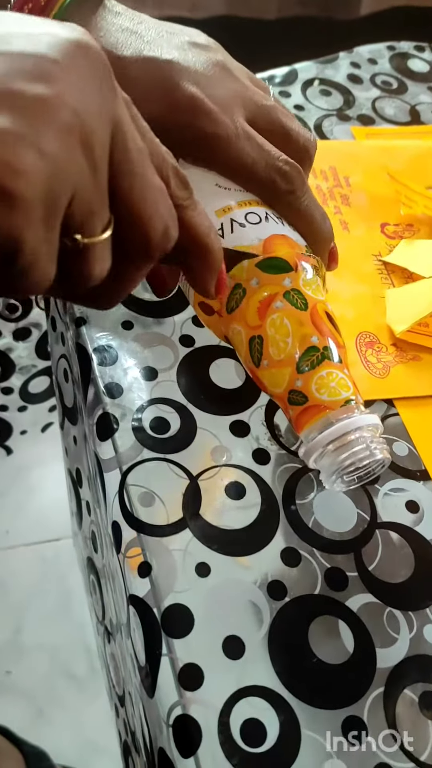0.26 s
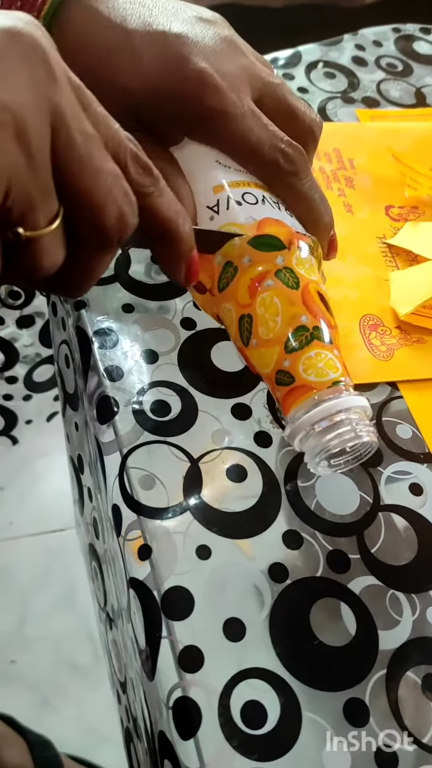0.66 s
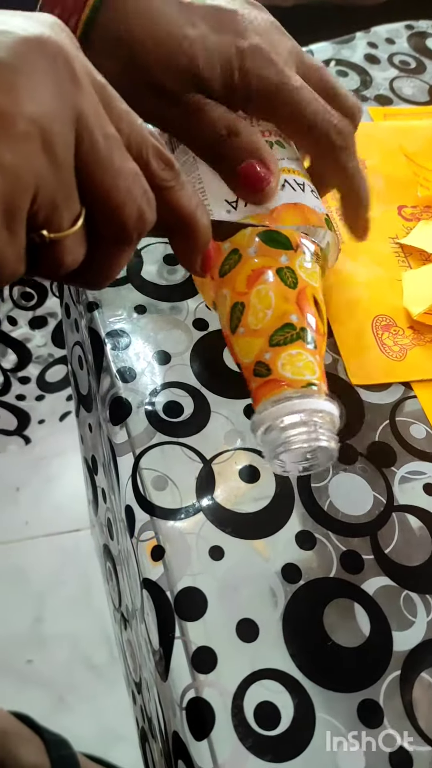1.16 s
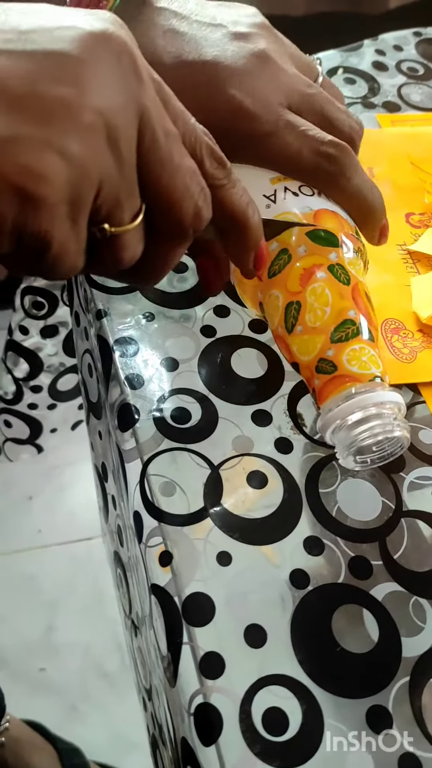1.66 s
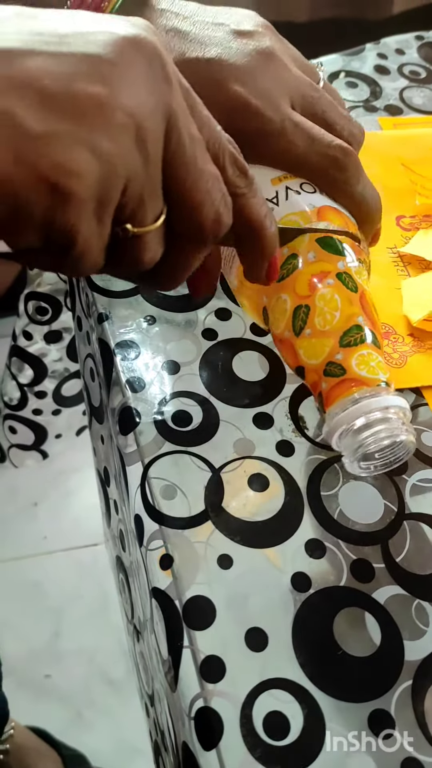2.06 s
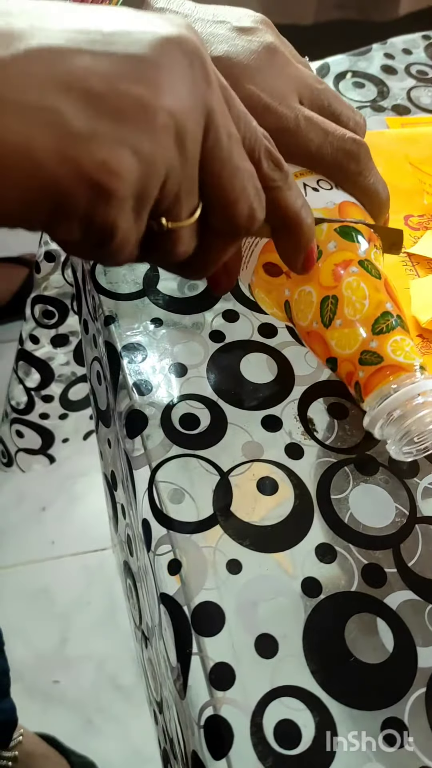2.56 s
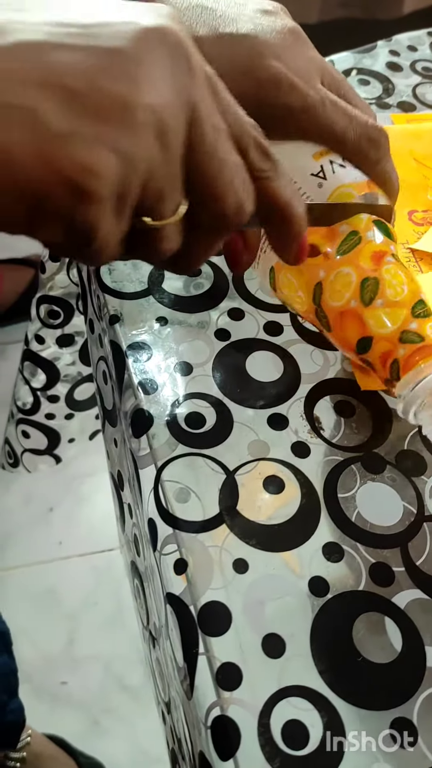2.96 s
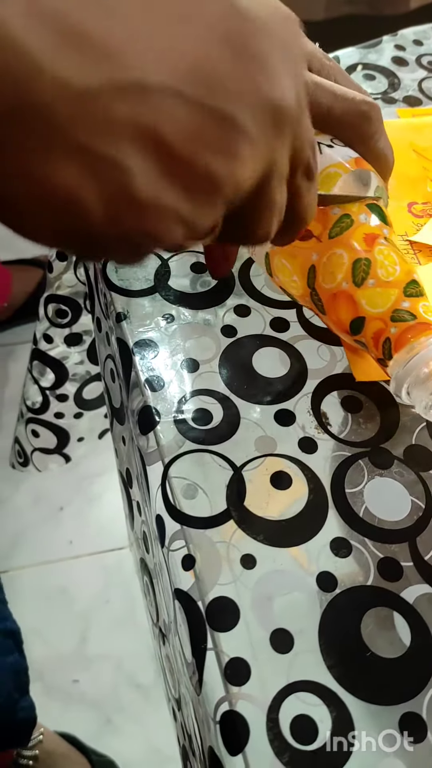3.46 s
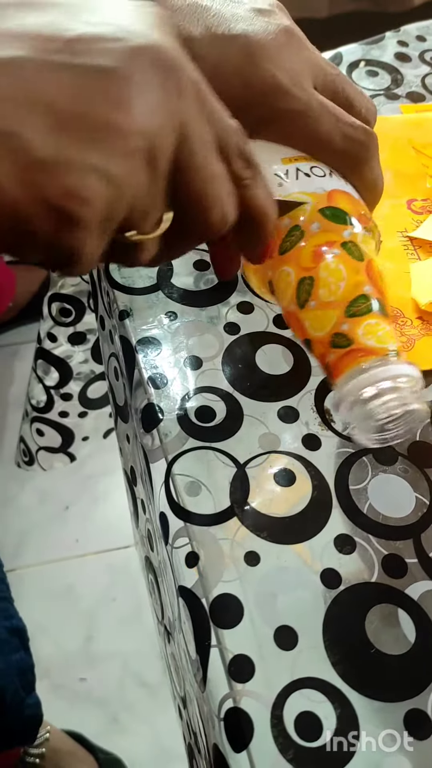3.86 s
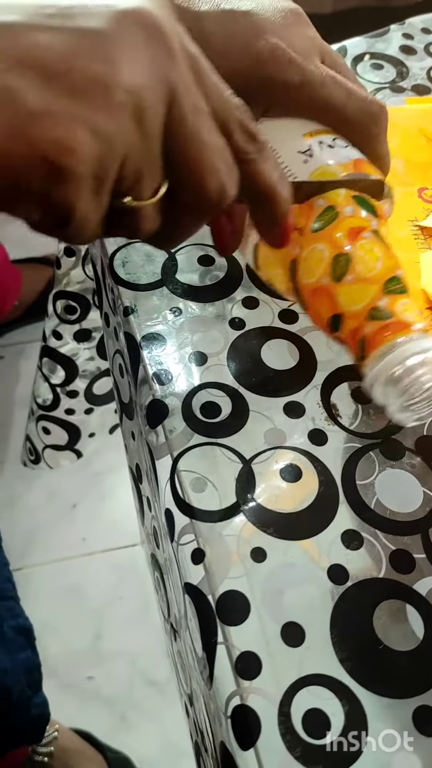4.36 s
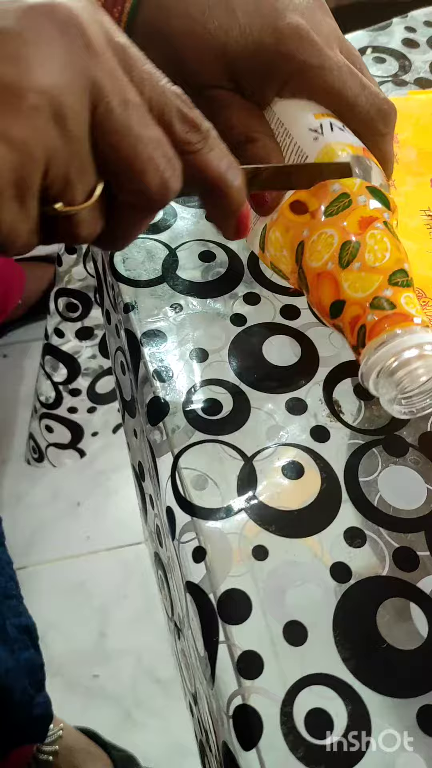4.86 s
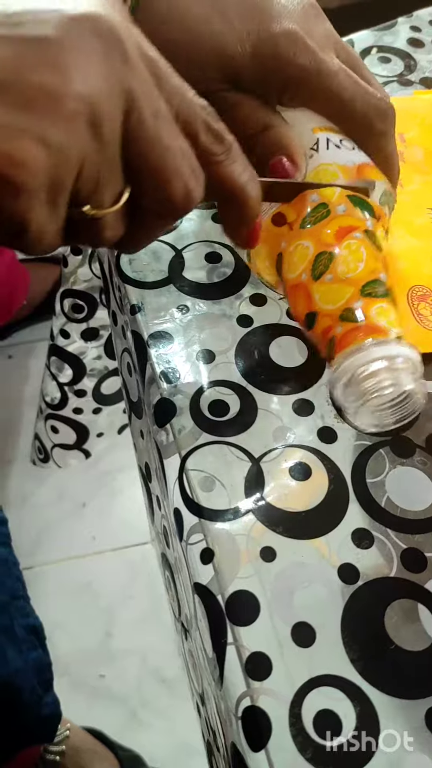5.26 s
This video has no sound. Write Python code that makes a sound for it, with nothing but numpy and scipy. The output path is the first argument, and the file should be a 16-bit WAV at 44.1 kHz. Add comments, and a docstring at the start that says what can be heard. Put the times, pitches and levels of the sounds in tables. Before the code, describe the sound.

Close stereo phone pickup of an empty bottle being handled: a soft cluster of crackles early, isolated snaps, a strong flurry before three seconds, a lull, then a dense rattle of pops around four seconds and more to the end. Fingers and blade scuff the plastic, hard pushes add low dull knocks, and hard walls add a short bright tail.

```python
"""In a small hard-walled room, a thin empty plastic bottle is held on a table and pressed with a knife.
Its wall buckles in snaps: a bright tick and a crack of filtered noise, then the hollow pop of the panel,
a sine that swells and fades. Fingers and blade rub in between as noise swelling with each stroke, and
hard pushes add low sagging notes. Resonators ring as wall and enclosed air, decaying noise as the room;
a phone listens from close by through two ports."""
import sys
import numpy as np
from scipy import signal
from scipy.fft import rfft, irfft, next_fast_len
from scipy.io import wavfile

SR = 44100
rng = np.random.default_rng(int(sys.argv[2]) if len(sys.argv) > 2 else 0)


def materialize(psi):
    """Save the field psi as 16-bit PCM at rate SR to the path in sys.argv[1].

    A 1-D psi becomes a single channel; in a 2-D psi each row is a channel.
    """
    bounded = np.clip(np.atleast_2d(psi).T, -1, 1)
    quanta = np.round(bounded * 32767).astype(np.int16)
    wavfile.write(sys.argv[1], SR, quanta)


N = 242682  # samples
PORT_LAG_S = 0.00023  # direct sound reaches the left port this much after the right
BODY_PAN_DB = 2.8  # the panel faces the left port: left minus right


def undb(db):
    """Level law: amplitude gain is 10 to the power of dB / 20."""
    return 10 ** (np.asarray(db) / 20)


def unit(x):
    """Normalisation by mean power: scale to rms 1."""
    return x / np.sqrt(np.mean(x ** 2) + 1e-20)


def bins(x):
    """Discrete Fourier transform: the frequencies [Hz] of the spectrum of x."""
    return np.arange(x.shape[-1] // 2 + 1) * SR / x.shape[-1]


def at(hz, points):
    """Interpolation of (frequency [Hz], value) points on a logarithmic frequency axis."""
    f, v = np.transpose(points)
    return np.interp(np.log(np.maximum(hz, 1)), np.log(f), v)


def colour(x, points):
    """Minimum-phase filtering: folding the cepstrum makes a causal filter of the given (Hz, dB) shape."""
    n = 2 * next_fast_len(x.shape[-1] // 2 + 1, True)
    hz = np.arange(n // 2 + 1) * SR / n
    cepstrum = irfft(np.log(undb(at(hz, points))), n)
    cepstrum[1:n // 2] *= 2
    cepstrum[n // 2 + 1:] = 0
    response = np.exp(rfft(cepstrum))
    return irfft(rfft(x, n) * response, n)[..., :x.shape[-1]]


def resonate(x, hz, width):
    """Simple resonance: a band-pass with gain 1 at its centre, width in Hz."""
    return signal.lfilter(*signal.iirpeak(hz, hz / width, fs=SR), x)


def swell(t, peak_s, sharp):
    """Attack and decay of an impulsive source: rises to 1 at peak_s and dies away."""
    u = np.maximum(t, 0) / peak_s
    return (u * np.exp(1 - u)) ** sharp


def burst(x, db):
    """Energy equivalence: give a short sound the energy of 5 ms at this rms level."""
    return x * undb(db) * np.sqrt(.005 * SR / np.sum(x ** 2))


def pan(x, db):
    """Interaural level difference: make the left channel this much louder than the right."""
    return x * undb(np.array([[db], [-db]]) / 2)


def add(out, x, s):
    """Superposition: mix x into out from time s."""
    i = max(round(s * SR), 0)
    out[:, i:i + x.shape[1]] += x[:, :max(N - i, 0)]


def port_time(size):
    """Propagation delay: time [s] since the event at the left and right ports."""
    return np.arange(size) / SR - np.array([[PORT_LAG_S], [0]])


def diffuse(size, alike_hz=750):
    """Diffuse-field coherence: noise from all around whose bass is alike at both ports."""
    mid, side = rng.standard_normal((2, size))
    f = bins(mid)
    apart = f ** 2 / (f ** 2 + alike_hz ** 2)
    shared = rfft(mid) * np.sqrt(1 - apart / 2)
    opposed = rfft(side) * np.sqrt(apart / 2)
    return irfft(shared + np.array([[1], [-1]]) * opposed, size)


# colour of the air noise in the room: (frequency [Hz], relative level [dB])
AIR_COLOUR = [(20, -9), (55, 5), (100, -10.5), (180, 7.5), (300, 3.5), (520, 1), (1000, -11), (2500, -13.5),
              (5000, -40), (8000, -33), (10500, -65), (15500, -50)]


def room_air():
    """Steady background noise: a diffuse field shaped mainly towards the bass."""
    noise = diffuse(size=next_fast_len(N, True))[:, :N]
    return undb(-56.5) * unit(colour(noise, AIR_COLOUR))


# share of a stroke spent speeding up; relative level of the resting grip [dB]
STROKE_RISE, GRIP_DB = 0.4, -62.5
# fingers and blade sliding on the plastic: (time at the fastest [s], relative level [dB], length scale [s])
STROKES = [(0.015, -44, .13), (0.413, -33, .08), (0.651, -35.5, .08), (1.038, -38.5, .13),
           (1.231, -45.5, .1), (1.742, -50.5, .4), (2.299, -35.5, .14), (2.486, -39.5, .07),
           (2.651, -41, .12), (2.789, -35, .2), (3.08, -47, .14), (3.447, -46.5, .09), (3.755, -34.5, .12),
           (4.12, -35.5, .08), (4.259, -36, 0.11), (4.493, -47, 0.11), (4.77, -24, .09), (5.11, -34, .1)]


def sliding():
    """Friction envelope: each stroke swells and dies away over the resting grip."""
    out = undb(GRIP_DB)
    for s, db, length in STROKES:
        u = (np.arange(N) / SR - s) / length
        side = np.where(u < 0, STROKE_RISE, 1 - STROKE_RISE)
        out = out + undb(db) * np.exp(-np.abs(u / side) ** 1.1)
    return out


# colour of the rubbing: (frequency [Hz], relative level [dB])
SLIDE_COLOUR = [(200, -3), (420, -1), (525, 7.5), (650, 9), (900, -2.5), (1500, -1.5), (3000, -5.5),
                (5500, -3), (7500, -4), (9000, -6), (10300, -18.5), (15500, -22.5)]


def rubbing(slips_per_s=420, spread_db=3.0, slip_s=0.0011, smooth=1.0):
    """Stick-slip friction: tiny slips of uneven size, each a short spit of noise, over a smooth hiss."""
    sizes = undb(spread_db * np.minimum(rng.exponential(size=N), 4))
    slips = (rng.random(N) < slips_per_s / SR) * sizes
    grip = signal.lfilter([1], [1, -np.exp(-1 / (slip_s * SR))], slips) + smooth
    noise = colour(grip * rng.standard_normal((2, N)), SLIDE_COLOUR)
    return unit(noise) * sliding() * undb(-8.5)


def ring(x, modes, stretch=1):
    """Modal superposition: modes driven by x, all detuned by one factor."""
    out = 0
    for hz, t60, db in modes:
        width = np.log(1000) / (np.pi * t60)
        out = out + undb(db) * resonate(x, hz * stretch, width)
    return out


# ringing of the air inside: (frequency [Hz], t60 [s], relative level [dB])
HOLLOW_MODES = [(508, 0.25, 1.5), (546.8, 0.28, -2.5), (656, 0.16, -14)]
# ringing of the plastic wall before detuning: (frequency [Hz], t60 [s], relative level [dB])
WALL_MODES = [(769, 0.024, -0.5), (1122, 0.023, -5), (1445, 0.084, 1), (1477, 0.13, -4),
              (1710, 0.068, -11.5), (2199, 0.059, 4), (4016, 0.038, -3)]


def bottle(x, detune=0.013):
    """Forced modal vibration: contact rings the air and the wall, detuned by one random factor per grip."""
    return x + ring(x, HOLLOW_MODES) + ring(x, WALL_MODES, 1 + detune * rng.standard_normal())


# reverberation time of the room: (frequency [Hz], t60 [s])
ROOM_T60 = [(150, 0.74), (500, 0.5), (1500, 0.49), (4000, 0.53), (8000, 0.47), (14000, 0.38)]
# colour of the reverberation: (frequency [Hz], relative level [dB])
ROOM_COLOUR = [(80, 0.5), (170, 2.5), (300, -5), (430, -0.5), (540, -8.5), (800, -1.5), (1100, 1),
               (1400, -1), (2500, -2), (4500, -3.5), (7500, -1.5), (9000, -5), (10500, -11.5), (15500, 1.5)]


def room(x, wet_db=-4.64, build_s=0.00096, early=0.66, early_s=0.028, size=2 ** 15):
    """Exponential reverberant decay: dense reflections off tiles and walls, each octave at its own rate."""
    t = np.arange(size) / SR
    noise = diffuse(size=size)
    octave = np.log2(np.clip(bins(noise), 125, 16000) / 125)
    spectrum, tail = rfft(noise), 0
    for k in range(8):
        band = irfft(spectrum * np.maximum(1 - abs(octave - k), 0), size)
        tail = tail + band * np.exp(-np.log(1000) * t / at(125 * 2 ** k, ROOM_T60))
    build_up = 1 - np.exp(-(t / build_s) ** 2)
    tail = tail * build_up * (1 + early * swell(t, early_s, 1.5))
    tail = colour(unit(tail) / np.sqrt(SR), ROOM_COLOUR)
    # the right channel is delayed to line up with the left before they are summed
    source = (x[0] + np.roll(x[1], int(PORT_LAG_S * SR))) / np.sqrt(2)
    return undb(wet_db) * signal.fftconvolve(source[None], tail, axes=1)


def crinkles(count=36, hz=550, fade_s=0.0086, pop_db=-1, thump_db=-14, crack_db=-3, tick_db=-3,
             spread_db=3, wide_db=5):
    """Random point process: faint buckles, likelier in stronger friction, at levels relative to it."""
    out, friction = np.zeros((2, N)), sliding()
    chance = np.cumsum(np.sqrt(friction))
    for when, size, side in rng.random((count, 3)):
        i = np.searchsorted(chance, when * chance[-1])
        db = 20 * np.log10(friction[i]) + spread_db * (2 * size - 1)
        pan_db = wide_db * (2 * side - 1)
        sound = snap(hz, db + pop_db, fade_s, db + thump_db, db + crack_db, EVEN_TILT_DB,
                     db + tick_db, RUN_S, pan_db)
        add(out, sound, i / SR)
    return out


def creases(t, count=5, within_s=0.034, top_db=-19, range_db=12):
    """Relaxation after buckling: a few tiny creases give way, weaker on the whole the later they come."""
    when, size = rng.random((2, count))
    out = 0
    for w, v in zip(when, size):
        out = out + undb(top_db - range_db * (w + v) / 2) * swell(t - w * within_s, 0.00019, 0.4)
    return out


def facets(x, count=4, low_hz=1200, high_hz=8500, q=7, ring_db=2):
    """Local resonance: small facets around each crease ring at random pitches, so snaps differ."""
    pitches = low_hz * (high_hz / low_hz) ** rng.random(count)
    return x + undb(ring_db) * sum(resonate(x, hz, hz / q) for hz in pitches)


def flip(t, hz, fade_s, rise_s=0.0044, bend=1.0, bend_s=0.0017):
    """Snap-through of a panel: a hard flip bends down in pitch and is soon over, a soft one rings hollow."""
    hard = min(0.0025 / max(fade_s, .0005), 1)
    pitch = hz * (1 + hard * (bend * np.exp(-np.maximum(t, 0) / bend_s) - .12))
    phase = 2 * np.pi * (np.cumsum(pitch * (t > 0), axis=1) / SR + rng.random())
    late = np.maximum(t - rise_s, 0)
    fade = np.exp((.002 - np.hypot(late, .002)) / max(fade_s, .0005) / 0.83)  # rounded at its start
    return np.sin(phase) * swell(np.minimum(t, rise_s), rise_s, 8.2) * fade


def thump(t, hz=290):
    """Damped bending vibration: the whole bottle flexes against the table near this pitch."""
    return np.sin(2 * np.pi * hz * (1 + 0.17 * rng.standard_normal()) * t) * swell(t, 0.0021, 1.8)


SNAP_SIZE = 2048  # samples
JERK_DB = 2.5  # how unevenly a crease runs (standard deviation)
# colour of the crack before its tilt: (frequency [Hz], relative level [dB])
CRACK_COLOUR = [(150, -27), (500, -20.5), (900, -0.5), (1150, -8), (1450, -4), (1900, -6.5), (2300, -5.5),
                (2900, -8), (3900, -8.5), (5200, -10.5), (6500, -15), (9000, -48.5)]
# colour of the tick: (frequency [Hz], relative level [dB])
TICK_COLOUR = [(3000, -24), (5000, -8.5), (6500, -7), (8000, -2.5), (9200, -3.5), (10300, -15.5),
               (12000, -17.5), (15500, -28)]


def snap(hz, pop_db, fade_s, thump_db, crack_db, tilt_db, tick_db, run_s, pan_db):
    """Buckling instability: a crease runs in jerks and sends the treble first, then the panel flips."""
    t = port_time(SNAP_SIZE)
    noise = rng.standard_normal((2, 2, SNAP_SIZE))
    shared = np.interp(t, t[1], rng.standard_normal(SNAP_SIZE))  # reaches both ports, lagged
    jerks = undb(JERK_DB * np.interp(t, t[1, ::32], rng.standard_normal(SNAP_SIZE // 32)))
    run_s = max(run_s, .0004)
    after = creases(t)
    tick_shape = jerks * (swell(t, 0.27 * run_s, 0.33) + 0.17 * swell(t, 0.0038, 2.6)) + after
    crack_shape = jerks * (swell(t, run_s, 1.45) + 0.31 * swell(t, 0.0033, 1.55)) + after
    tick = colour((noise[0] + 0.51 * shared) * tick_shape, TICK_COLOUR)
    tilted = [(f, db + tilt_db * np.log2(np.clip(f, 1000, 5000))) for f, db in CRACK_COLOUR]
    crack = colour((noise[1] + 1.3 * shared) * crack_shape, tilted)
    body = burst(flip(t, hz, fade_s), pop_db - .6) + burst(thump(t), thump_db)
    treble = burst(facets(crack), crack_db - .3) + burst(facets(tick), tick_db - 4.5)
    return pan(body, BODY_PAN_DB) + pan(treble, pan_db)


# a pop of this relative level makes a thump of this one; the hand lets through this share of each dB more
USUAL_POP_DB, THUMP_DB, THUMP_SHARE = -21, -44.5, 0.49
# crack tilt when tick and crack are equal [dB per octave], and its change per dB of tick over crack
EVEN_TILT_DB, TILT_PER_DB = -0.95, 0.62
# running time of a crease in a taut wall with tick and crack equal; time added just after a buckle;
# time constant of the wall tautening again
RUN_S, SLACK_RUN_S, TAUTEN_S = 0.001, 0.0013, 0.023
# a bright crease is quick: the taut running time halves for this much tick over crack
QUICK_DB = 16
# buckles of the wall: (time [s], nominal panel pitch [Hz], relative pop level [dB], nominal pop fade [s],
# relative crack level [dB], relative tick level [dB], left minus right of crack and tick [dB])
SNAPS = [(0.1133, 553, -31.5, 0.0093, -32, -33.5, -3.5), (0.158, 539, -32.5, 0.047, -54, -61, 2),
         (0.3732, 518, -38, 0.031, -30, -23.5, -3.5), (0.426, 522, -30, 0.017, -33, -41, -1),
         (0.453, 549, -19, 0.011, -20, -16, -2), (0.5953, 582, -21, 0.0042, -29, -25.5, -7.5),
         (0.6255, 559, -25.5, 0.013, -37, -54, -3), (0.6635, 531, -22.5, 0.01, -32.5, -31, -9),
         (0.6726, 550.5, -16, 0.017, -24.5, -29.5, -1), (0.693, 592, -21.5, 0.01, -27, -38.5, -4),
         (0.6976, 546, -24, 0.0073, -30, -28.5, -5), (0.8, 550, -39.5, 0.0034, -34.5, -35.5, 3),
         (0.8835, 570, -37, 0.0029, -37, -36, 3), (0.9193, 630, -9.5, 0.0018, -10.5, -18, 3.5),
         (0.9708, 560, -44, .002, -42, -29, -4), (1.195, 549, -40, .012, -65, -70, 0),
         (1.2205, 555, -44, 0.0071, -55, -45, 1), (1.2871, 580, -20.5, 0.0032, -16.5, -19, -5),
         (1.844, 512, -40.5, 0.0055, -55, -51, 6), (1.889, 524, -44, 0.0052, -54, -52, 0),
         (2.057, 580, -53, .002, -34, -37, 3), (2.0697, 546, -37.5, 0.0013, -52, -32, 12),
         (2.083, 650, -31, .002, -25.5, -20, -3), (2.115, 630, -19, 0.00088, -12, -12.5, 6),
         (2.1588, 600, -16.5, .002, -15, -14, 9), (2.264, 544, -34, 0.0016, -31, -20.5, 1),
         (2.2718, 586, -9.5, 0.0016, -14, -28.5, -2), (2.2971, 512, -16.5, 0.013, -29.5, -22, 3),
         (2.3073, 522, -16.5, 0.0061, -35, -29, 9), (2.3164, 535, -17.5, 0.0083, -33, -34, -2),
         (2.5452, 594, -13, 0.0013, -12, -16, 4), (2.5768, 664, -46, .002, -25.5, -18.5, 5),
         (2.5905, 602, -32, .003, -24.5, -16.5, 4.5), (2.719, 585, -35, 0.0023, -29.5, -31, 5),
         (2.7366, 601, -9.5, 0.00084, -15, -23, 0), (2.757, 440, -18, .004, -26, -26, 3),
         (2.7752, 648, -14.5, 0.0037, -20, -28.5, 4), (2.8061, 495, -10.5, 0.0045, -12, -19, -1),
         (2.886, 534, -60, .0013, -58, -34.5, -20.5), (3.0104, 548, -11.5, 0.0014, -12.5, -18.5, -5.5),
         (3.296, 508, -42.5, 0.0047, -56.5, -82.5, 0), (3.482, 542, -44, .002, -43, -57, 6),
         (3.518, 610, -58, .004, -54, -43.5, 3), (3.6332, 597, -13, 0.0027, -14.5, -26, 0),
         (3.6385, 540, -25.5, 0.00074, -20.5, -14, 3.5), (3.6565, 873, -26.5, 0.00048, -35, -22.5, -4),
         (3.669, 710, -47, .002, -32, -21.5, 2), (3.7148, 577, -33, 0.0031, -24.5, -17.5, 1),
         (3.8682, 575, -22.5, 0.0037, -24.5, -22.5, -2.5), (3.927, 555, -22, .0035, -23.5, -25, 2),
         (3.9391, 588, -11.5, 0.0031, -15.5, -13.5, 2), (3.9492, 499, -23, 0.0041, -29, -24, 4),
         (3.9803, 573, -16.5, 0.0046, -20, -17, -3), (3.9862, 501, -20.5, 0.0045, -18.5, -18.5, 4),
         (4.0109, 532, -22.5, 0.0053, -21, -25, -6), (4.0169, 543, -19, 0.0049, -20, -29, 3),
         (4.0761, 626, -28, 0.0033, -24, -20.5, 0), (4.0976, 534, -18.5, 0.0041, -25, -34, -1),
         (4.1252, 598, -20, 0.0098, -21, -25.5, 0), (4.1551, 547, -13.5, 0.0041, -25, -27, 2),
         (4.1611, 624, -6, 0.0032, -18.5, -24, 1), (4.2693, 640, -48, 0.0017, -22, -17.5, 3),
         (4.28, 650, -45, 0.0022, -25.5, -22, 1.5), (4.328, 539, -15, 0.0034, -16, -16.5, 7.5),
         (4.3506, 540, -17.5, 0.0032, -15, -23, 3), (4.618, 608, -26, 0.0065, -30.5, -39, -4.5),
         (4.659, 645, -16.5, 0.0011, -15.5, -16.5, 2), (4.6622, 606, -15.5, 0.00054, -15, -22, -2),
         (4.6742, 568, -16.5, .0015, -18, -15.5, 0), (4.7282, 550, -12.5, 0.0026, -14.5, -15.5, -5.5),
         (4.7394, 575, -17, 0.0018, -18.5, -23.5, 13), (4.7449, 746, -14, 0.0011, -18.5, -22, 1),
         (4.7625, 592, -15, 0.0018, -23, -30, 10), (4.7665, 623, -17, 0.0017, -17, -32, -2),
         (4.7769, 527, -16.5, 0.0016, -19, -16.5, 2), (4.7878, 612, -22, 0.0025, -14, -23.5, 5.5),
         (4.7938, 632, -12.5, 0.0013, -23, -47, 0), (4.9171, 578, -23, .007, -27, -42.5, -4),
         (4.9908, 582, -14.5, 0.0011, -12, -11, 6.5), (5.0129, 663, -18.5, 0.0038, -26.5, -36, 16),
         (5.0315, 546, -23, 0.0035, -25, -20.5, 10), (5.1987, 638, -33.5, 0.0033, -45, -52.5, -2),
         (5.2522, 770, -50, .002, -54, -28, 15), (5.259, 703, -24.5, 0.0028, -17.5, -25.5, -2.5),
         (5.269, 698, -19, 0.0041, -18, -21, 0), (5.275, 650, -19, 0.0033, -23.5, -41, 19)]


def buckles():
    """Elastic buckling: the pop rocks the bottle, crack brightens with tick, a slack wall creases slowly."""
    out, last_s = np.zeros((2, N)), -np.inf
    for s, hz, pop_db, fade_s, crack_db, tick_db, pan_db in SNAPS:
        thump_db = THUMP_DB + THUMP_SHARE * (pop_db - USUAL_POP_DB)
        bright_db = tick_db - crack_db
        tilt_db = EVEN_TILT_DB + TILT_PER_DB * bright_db
        run_s = RUN_S * .5 ** (bright_db / QUICK_DB) + SLACK_RUN_S * np.exp((last_s - s) / TAUTEN_S)
        add(out, snap(hz, pop_db, fade_s, thump_db, crack_db, tilt_db, tick_db, run_s, pan_db), s)
        last_s = s
    return out


SAG_OCT_PER_S = 23.8  # the side goes slack as it caves in, so its pitch sags
# the whole side caves in: (time [s], starting pitch [Hz], relative level [dB], length [s])
CAVES = [(2.161, 272, -35, 0.0085), (2.287, 417, -25, 0.047), (2.765, 434, -16.5, 0.024),
         (2.807, 326, -24.5, 0.0062), (3.635, 306, -29.5, 0.0083), (3.941, 316, -25.5, 0.0076),
         (3.948, 290, -33, 0.0057), (3.984, 332, -24.5, 0.0086), (4.017, 310, -34, .009),
         (4.098, 292, -29, 0.01), (4.123, 335, -26.5, 0.011), (4.164, 314, -25, 0.0097),
         (4.744, 348, -32, 0.014), (4.792, 338, -28, 0.014), (5.012, 250, -32.5, 0.007),
         (5.261, 290, -33.5, 0.0067)]


def caving():
    """Falling stiffness: under the hardest pushes the whole side gives way with a low, sagging note."""
    out = np.zeros((2, N))
    t = port_time(2 * SNAP_SIZE)
    for s, hz, db, length in CAVES:
        pitch = hz * 2 ** (-SAG_OCT_PER_S * t)
        phase = 2 * np.pi * (np.cumsum(pitch * (t > 0), axis=1) / SR + rng.random())
        note = np.sin(phase) * np.sin(np.pi * np.clip(t / length, 0, 1))
        add(out, pan(burst(note, db), BODY_PAN_DB), s)
    return out


def scene(count=11):
    """Source and path in series: in each of equal grips the ring and the room paths are drawn anew."""
    out = room_air()
    contact = buckles() + caving() + rubbing() + crinkles()
    for grip in np.array_split(np.arange(N), count):
        padded = np.pad(contact[:, grip], ((0, 0), (0, SR // 5)))  # space to ring on
        near = bottle(padded + 1e-18)
        add(out, near, grip[0] / SR)
        add(out, room(near), grip[0] / SR)
    return out


TOP_HZ = 15600  # upper limit of the phone
# resonances of the left and right microphone ports: (frequency [Hz], width [Hz], lift [dB])
PORTS = [(8730, 580, 14), (7310, 900, 14)]


def record(dry):
    """Port resonance and saturation: each port lifts its treble band; peaks are rounded, the top cut."""
    heard = np.array([x + (undb(db) - 1) * resonate(x, hz, width)
                      for x, (hz, width, db) in zip(dry, PORTS)])
    heard = heard / (1 + heard ** 6) ** (1 / 6)
    return signal.sosfilt(signal.ellip(10, .2, 95, TOP_HZ, fs=SR, output="sos"), heard)


dry = scene()
out = record(dry)
materialize(out)
```